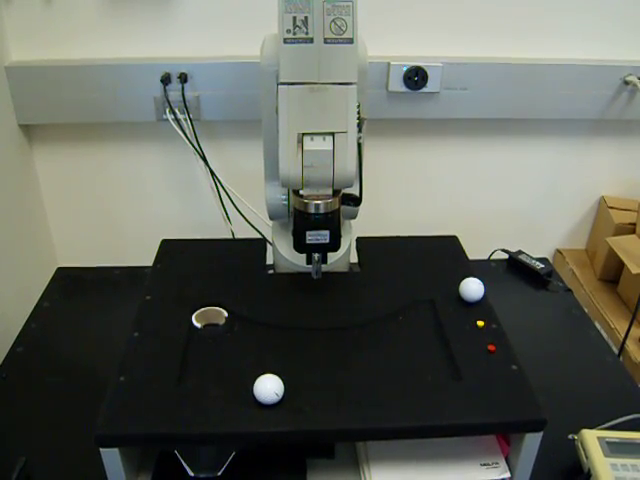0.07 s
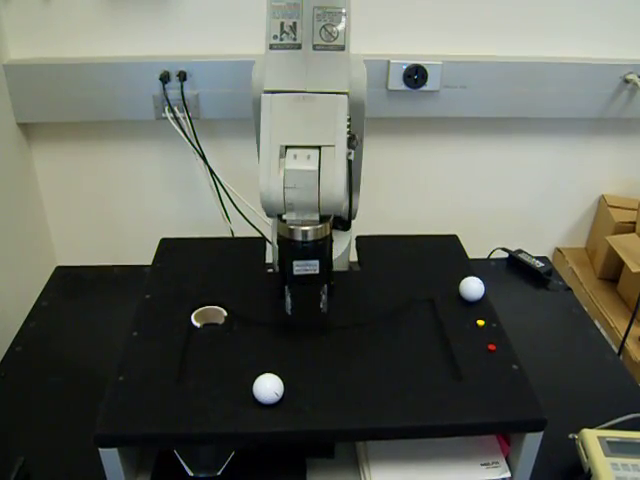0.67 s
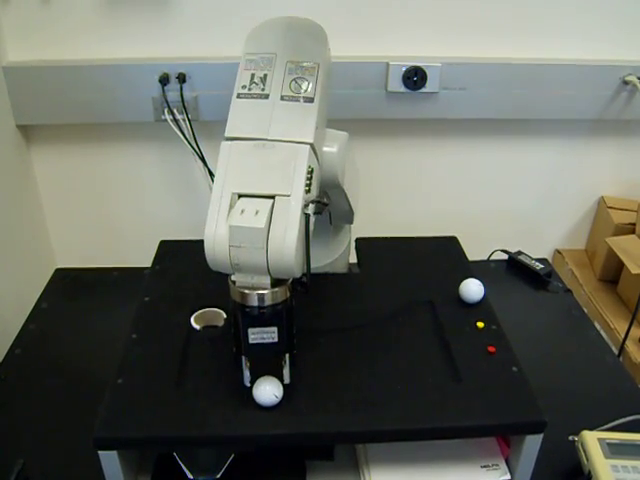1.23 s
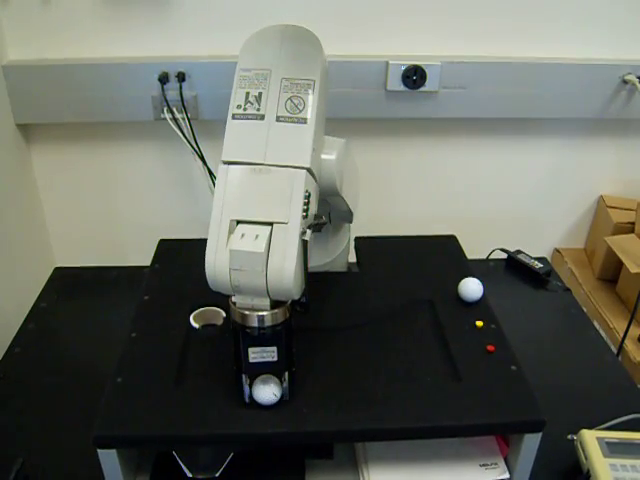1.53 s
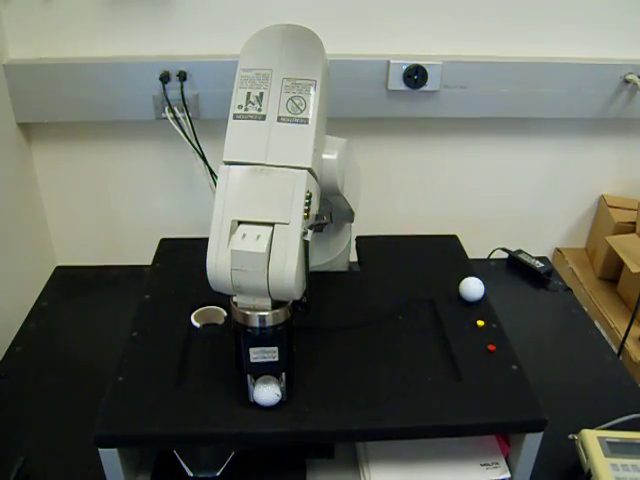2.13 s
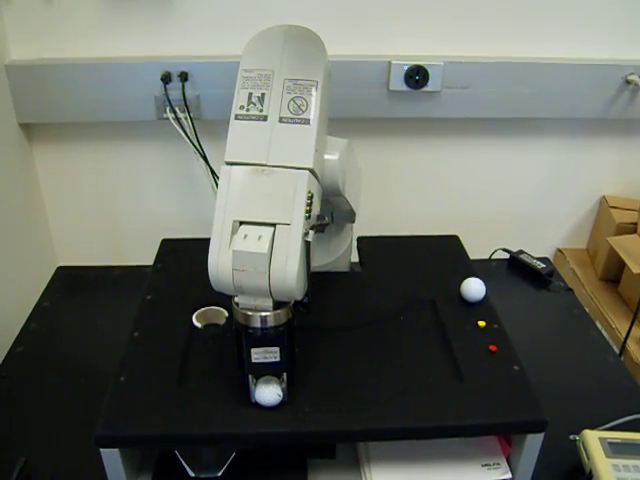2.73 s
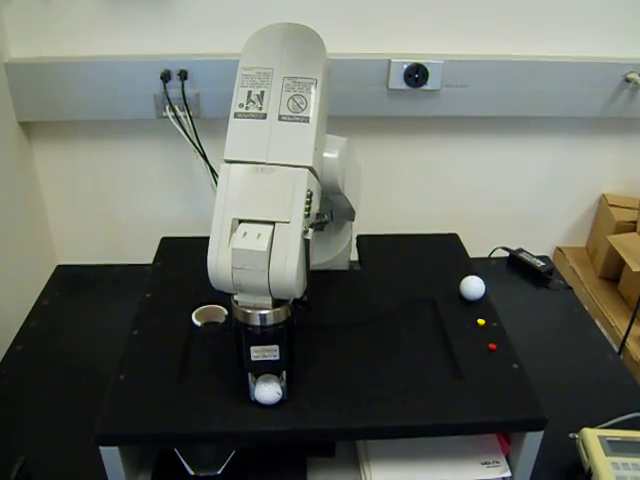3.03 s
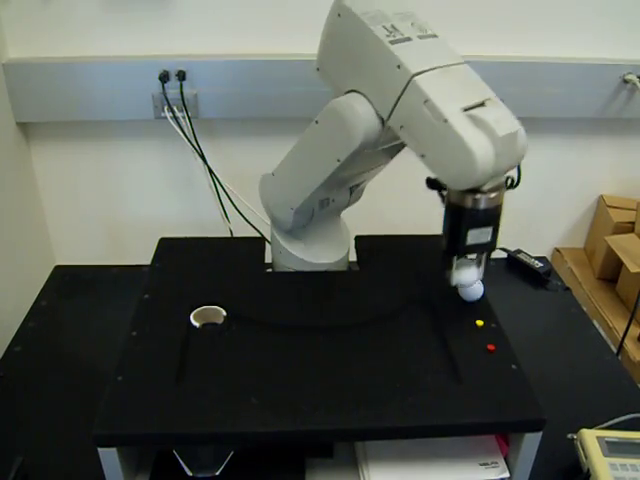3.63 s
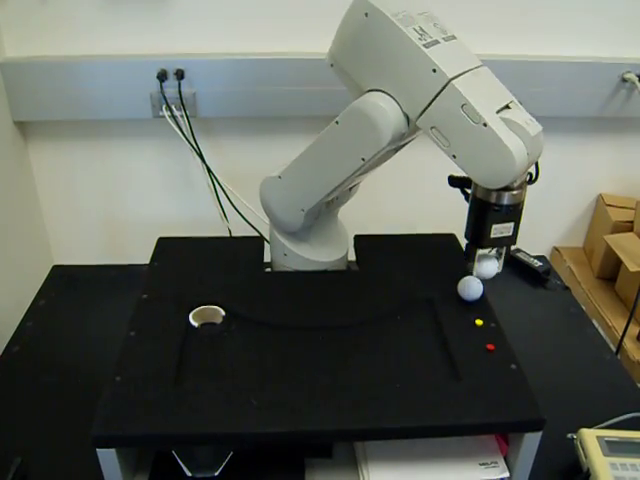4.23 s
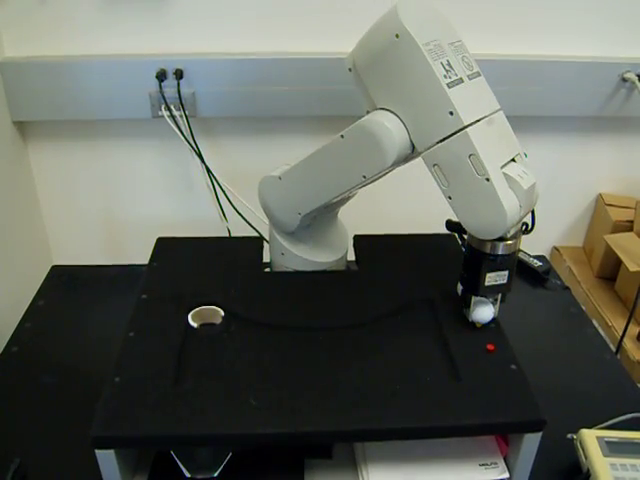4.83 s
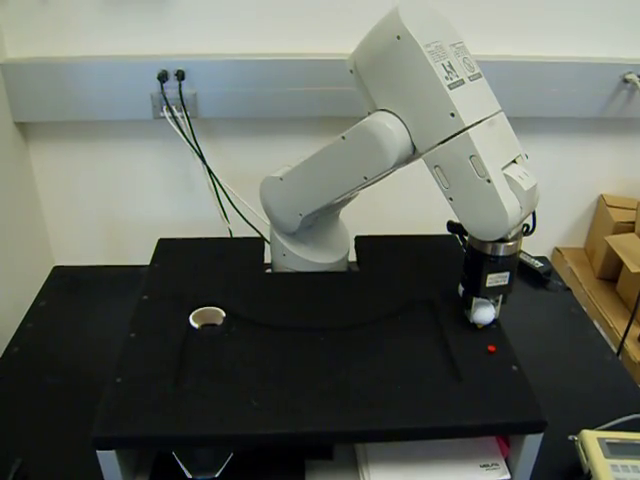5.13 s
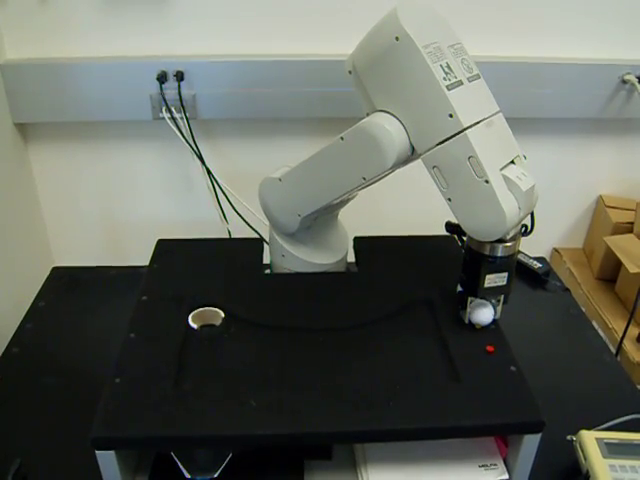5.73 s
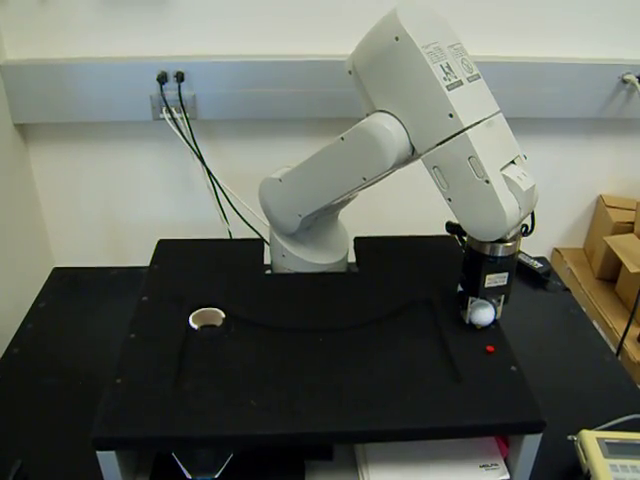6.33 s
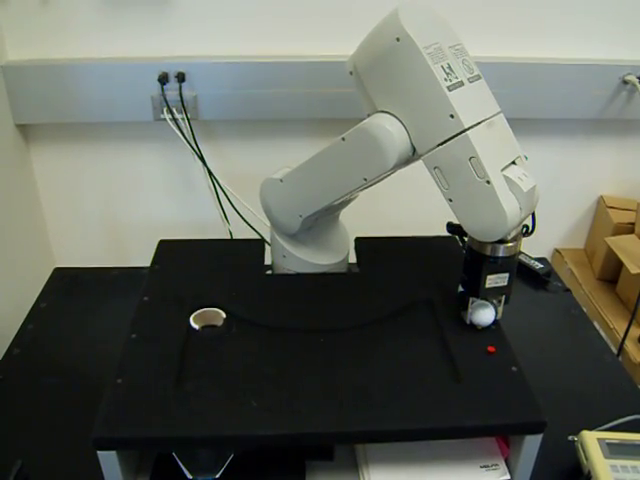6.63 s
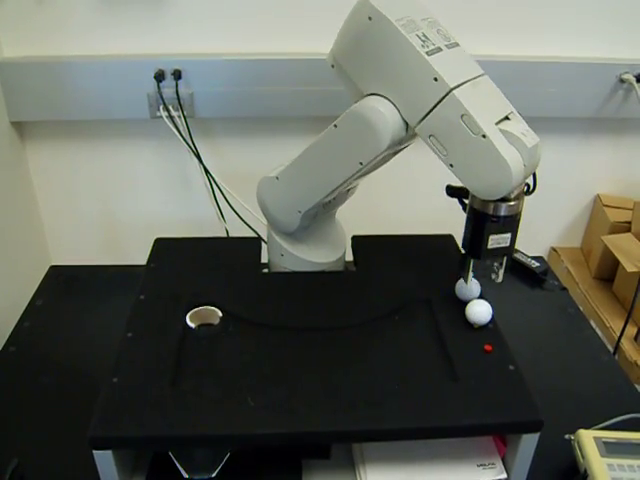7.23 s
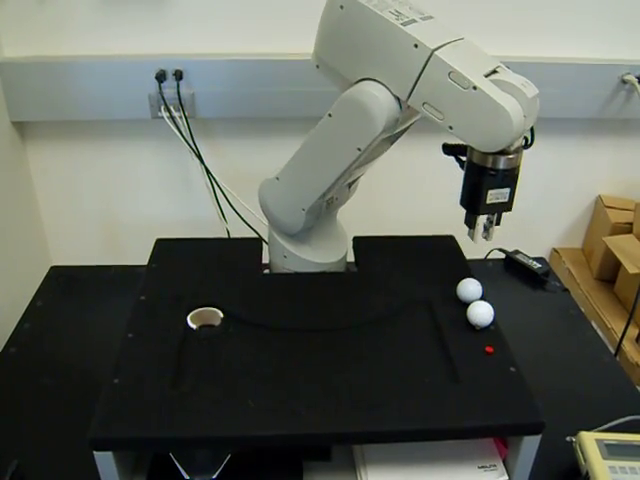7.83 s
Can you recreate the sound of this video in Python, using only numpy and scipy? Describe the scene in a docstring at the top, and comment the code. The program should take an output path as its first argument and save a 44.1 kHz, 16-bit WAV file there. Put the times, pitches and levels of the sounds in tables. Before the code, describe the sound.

A robot arm works at a lab bench, heard through one microphone over humming controller fans. Its motors whir through two fast moves and hiss through three slow ones, with a faint high whistle. The gripper rattles and clacks four times. After the loud second clack and a sharp snap, the sound ducks for about a second. Later a golf ball knocks softly on a board as it is let go.

```python
"""At a lab bench, a robot arm picks up a golf ball and sets it down, over its controller's fans and hum.
Geared motors whir through two fast moves; bearings hiss through three slow ones, and a drive whistles.
The gripper rattles and clacks as its parts hit each other, and the released ball knocks on a board.
The grip and one sharp snap make an automatic volume control dip for about a second, then recover."""
import sys
import numpy as np
from scipy import signal
from scipy.fft import rfft, irfft, next_fast_len
from scipy.io import wavfile
from scipy.ndimage import uniform_filter1d, minimum_filter1d

SR = 44100
rng = np.random.default_rng(int(sys.argv[2]) if len(sys.argv) > 2 else 0)


def log_audio(samples):
    """Write samples as a 16-bit WAV file to the path given in sys.argv[1]."""
    # one column per channel
    frames = np.atleast_2d(samples).T
    # limit to full scale, then quantise
    limited = np.clip(frames, -1, 1)
    pcm = np.round(limited * 32767).astype(np.int16)
    wavfile.write(sys.argv[1], SR, pcm)


N = 352359
TIME = np.arange(N) / SR

# The two fast moves: (start [s], end [s])
REACH_SPAN, SWING_SPAN = (0.33, 1.225), (3.23, 3.92)
FAST_RAMP_S, SLOW_RAMP_S = 0.24, 0.18   # time to speed up, and again to brake
# Gear tones at top speed in each fast move: (pitch [Hz], relative level [dB])
REACH_TONES = [(87.9, -30), (143.5, -26.5), (217, -34), (384, -40), (883, -33), (960, -31), (1439, -22),
               (1493, -26), (1577, -28.5), (1604, -24.5), (2880, -33), (3990, -35.5)]
SWING_TONES = [(555, -34.5), (760, -40.5), (1425, -37), (1470, -38), (1620, -40), (2105, -39.5),
               (2230, -48)]
# How the arm's metal body colours each fast move: (frequency [Hz], relative level [dB])
REACH_BODY = [(50, -5), (100, -14), (220, 0.5), (320, -22.5), (400, -5), (620, -15), (950, -2.5),
              (1230, -12), (1520, -6), (2250, -11.5), (2900, -11.5), (4000, -14), (5300, -20.5),
              (7250, -12.5)]
SWING_BODY = [(90, -33), (200, -21), (450, -5), (560, -10.5), (660, -17), (900, -12.5), (1250, -9.5),
              (1520, -5), (1830, -12.5), (2300, -7.5), (4400, -14), (5000, -10.5), (5600, -17.5),
              (7250, -12)]
# Slow moves: (start [s], end [s], hiss level halfway [dB])
SLOW_MOVES = [(1.138, 1.675, -30.5), (3.76, 4.82, -33.5), (6.823, 8.2, -29.5)]
# The colour of the bearing hiss: (frequency [Hz], relative level [dB])
BEARING_COLOUR = [(100, 1), (220, 2.5), (430, 3.5), (700, -8), (1500, -1), (2100, -9.5), (2900, 0),
                  (3900, -2), (4600, -2.5), (5050, -1), (5500, -5.5), (6600, -9.5), (7300, -6),
                  (8000, -5.5)]
# When a drive whistles: (start [s], end [s], level [dB])
WHISTLES = [(0.68, 1.2, -37), (1.315, 1.606, -32.5), (3.48, 3.9, -41), (3.96, 4.812, -41.5),
            (6.903, 7.7, -42)]

# The ways the gripper rings: (pitch [Hz], width [Hz], relative level [dB])
GRIPPER_RINGS = [(779, 290, 0), (1125, 550, 0.5), (1836, 810, -1.5), (3166, 270, 2), (3810, 160, 2.5),
                 (4520, 350, 1.5), (5370, 1700, -10), (8200, 7800, -12.5)]
# Gripper strokes; a fade time is how long a sound takes to fall by 60 dB: (start [s], stop [s],
# drive level [dB], first clack [dB], its fade time [s], last clack [dB], time from touch to stop [s])
STROKES = [(0.1226, 0.46, -22, -15.5, 0.26, -10, 0.011), (2.0559, 2.1418, -22.5, -13, 0.12, 0.5, 0.019),
           (5.6956, 5.7848, -23, -17, 0.079, -14, 0.0105), (7.676, 7.983, -28, -16.5, 0.14, -18.5, 0.018)]
# The finger links catch on the way: (time [s], level [dB])
CATCHES = [(0.2432, -18), (0.3362, -22.5), (2.106, -17), (5.726, -20), (7.8837, -23), (7.9127, -23.5)]
# The extra ring in each kind of clack: (pitch [Hz], width [Hz], relative level [dB])
START_RING, STOP_RING, CATCH_RING = (4550, 350, 6), (2960, 350, 7.5), (4960, 350, 6)
# The ways the snap rings: (pitch [Hz], relative level [dB], fade time [s])
SNAP_RINGS = [(950, -7, .006), (1550, -4, .007), (2350, -10, .007), (3230, -15, .008), (4000, -22, .04),
              (4800, -13, .009), (5750, -21, .055), (5980, -16, .035), (7500, -17, .012)]
# The ball's knocks on the board: (time [s], level [dB])
BALL_KNOCKS = [(5.7205, -13), (5.730, -19.5), (5.749, -20.5), (5.7684, -19), (5.783, -21), (5.81, -22.5)]
# The ways the board rings: (pitch [Hz], width [Hz], relative level [dB])
BOARD_RINGS = [(247, 34, 6.5), (480, 106, -7.5), (695, 46, 1.5), (920, 39, -7), (1135, 120, -10),
               (1630, 170, -15)]

# The colour of the fans' rushing air: (frequency [Hz], relative level [dB])
FAN_COLOUR = [(12, -24), (22, -0.5), (38, 5), (52, -16), (150, -0.5), (205, -7.5), (255, -5.5),
              (440, -11.5), (560, -16), (830, -14), (1150, -18), (1950, -22), (2750, -20), (5500, -28)]
# Mains hum, plus a fan blade tone that beats with the third hum tone: (pitch [Hz], relative level [dB])
HUM_TONES = [(58.6, -40), (117.7, -39), (176.4, -36.5), (174.4, -40.5), (239.5, -45)]
# The thin whine of fans and drives: (pitch [Hz], relative level [dB])
WHINE_TONES = [(613.7, -60.5), (1054, -46), (1227.5, -55), (1405, -54.5), (1755, -58), (2810, -66.5),
               (3338, -79.5), (5744, -64), (5960, -57)]
# How the controller's sound changes as the arm moves in front of it: (time [s], level change [dB])
CONTROLLER_LEVEL = [(0, -0.5), (2.0, -0.5), (2.9, -5), (3.95, -4.5), (4.7, -2), (5.4, -0.5), (6.4, -4.5),
                    (7.9, 0.5)]


def geared_motor(span, tones, body, grind_db, tones_db, turn_hz, throb_db,
                 wobble, speed_power, brake_db, swell_db_per_s):
    """Gear teeth grind inside the metal body; their tones rise with speed and stand out near the top."""
    speed = move(*span, FAST_RAMP_S)
    braking = uniform_filter1d(np.maximum(-np.gradient(speed, TIME), 0), SR // 20)
    pitch = speed * (1 + wobble * drift(46.3))
    turn = np.sin(2 * np.pi * np.cumsum(turn_hz * pitch) / SR)   # one wave per motor turn
    teeth = rng.standard_normal(N) + tiny_ticks(per_s=1500, spread_db=4.5)
    teeth += 0.8 * rotor_buzz(turn_hz * pitch)
    grind = from_db(grind_db) * coloured(teeth * from_db(throb_db * turn), body)
    whir = sum(tone(hz * pitch, db + tones_db + 3.87 * drift(30)) for hz, db in tones)
    swell_db = swell_db_per_s * (np.clip(TIME, *span) - np.mean(span))
    load_db = brake_db * braking + swell_db   # slowing down loads the teeth
    return speed ** speed_power * from_db(load_db) * (speed ** 2.8 * whir + grind)


def bearing_hiss(swell_db=6.5):
    """Rolling bearings hiss at low speed, growing louder as each slow move goes on."""
    rolling = coloured(rng.standard_normal(N) + tiny_ticks(per_s=760, spread_db=3.5), BEARING_COLOUR)
    level = 0
    for start, end, db in SLOW_MOVES:
        progress = np.clip((TIME - start) / (end - start), 0, 1)
        level += move(start, end, SLOW_RAMP_S) * from_db(db + swell_db * (progress - 0.5))
    return level * from_db(2.1 * drift(40)) * rolling


def gripper(strain_s=0.06, strain_db=3.5, touch_db=-4.5):
    """Each stroke clacks as it starts, ticks as it runs, strains, touches lightly and hits its stop."""
    running = 0
    for start, stop, db, *_ in STROKES:
        straining = TIME > stop - strain_s
        running += from_db(db + strain_db * straining) * ((TIME > start) & (TIME < stop))
    throb_hz = 42 * (1 + 0.13 * drift(21))
    throb = from_db(2.7 * np.sin(2 * np.pi * np.cumsum(throb_hz) / SR))
    rubbing = 0.27 * tiny_ticks(per_s=820, spread_db=5.0) + 0.48 * rng.standard_normal(N)
    screw_ring = (4740, 390, 2.8)   # the drive screw adds its own ring
    out = resonate(running * throb * rubbing, GRIPPER_RINGS + [screw_ring])
    for start, stop, _, start_db, start_fade_s, stop_db, gap_s in STROKES:
        add(out, start, clack(start_db, START_RING, start_fade_s))
        add(out, stop - gap_s, clack(stop_db + touch_db, STOP_RING))
        add(out, stop, clack(stop_db, STOP_RING))
    for time_s, db in CATCHES:
        add(out, time_s, clack(db, CATCH_RING, fade_s=0.032))
    return out


def clack(db, ring, fade_s=0.029):
    """The finger links hit each other once, and one ring stands out."""
    return from_db(db) * rattle(fade_s, GRIPPER_RINGS + [ring])


def snap(time_s=2.3609, boost_db=20.5):
    """One hard hit sets off several rings that die away quickly."""
    out, age = np.zeros(N), np.arange(SR // 10) / SR
    for k, (hz, db, fade_s) in enumerate(SNAP_RINGS):
        fade = from_db(boost_db + db - 60 * age / fade_s)
        add(out, time_s, (-1) ** k * fade * np.sin(2 * np.pi * hz * age))
    return keep_band(out, "high", hz=550)


def ball():
    """The released ball settles on the board with a few dull knocks."""
    out = np.zeros(N)
    for time_s, db in BALL_KNOCKS:
        add(out, time_s, from_db(db) * rattle(fade_s=0.098, rings=BOARD_RINGS))
    return out


def shudder(time_s=3.762):
    """Braking from the swing shakes the whole arm in one short, low thud."""
    out = np.zeros(N)
    add(out, time_s, from_db(-25) * rattle(fade_s=0.12, rings=[(145, 50, 0)]))
    return keep_band(out, "low", hz=260)


def drive_whistle(flicker_db=3):
    """A drive rings at one high, unsteady pitch that swells and dies as the arm moves."""
    ring = resonate(rng.standard_normal(N), [(5044, 91, 0)])
    ring = unit_power(resonate(ring, [(4930, 160, 0)]))
    level = sum(from_db(db) * move(start, end, SLOW_RAMP_S) for start, end, db in WHISTLES)
    return level * from_db(flicker_db * drift(25)) * ring


def holding_joint(start_s=5.7, end_s=6.85, hz=4590, db=-53.5):
    """A joint sings faintly while it holds still under load."""
    return move(start_s, end_s, SLOW_RAMP_S) * tone(hz * (1 + 0.0045 * drift(45)), db + 3 * drift(17))


def controller(air_db=-28, whine_fade_db_per_s=0.63):
    """Fans push air and buzz faintly, the mains hums, and thin whines waver and slowly fade."""
    change_db = np.interp(TIME, *np.transpose(CONTROLLER_LEVEL))
    whine_db = 9.5 + 1.22 * change_db - whine_fade_db_per_s * TIME
    buzz = keep_band(rotor_buzz(87.75 * (1 + 0.00071 * drift(7.95))), "high", hz=300)
    air = from_db(air_db) * coloured(rng.standard_normal(N) + from_db(-9.5) * buzz, FAN_COLOUR)
    hum = sum(tone(hz * (1 + 0.00391 * drift(3.59)), db + 2.8 * drift(4.3)) for hz, db in HUM_TONES)
    whine = sum(tone(hz * (1 + 0.0008 * drift(7.8)), db + 1.4 * drift(7.9)) for hz, db in WHINE_TONES)
    return from_db(change_db) * (air + hum) + from_db(whine_db) * whine


def room_echo(x, early_db, early_fade_s, late_db, late_fade_s):
    """Sound bounces off the nearby bench and wall, then lingers faintly in the room."""
    age = np.arange(SR // 2) / SR
    echoes = 0
    for db, fade_s in (early_db, early_fade_s), (late_db, late_fade_s):
        tail = rng.standard_normal(len(age)) * (age > 0.004) * from_db(-60 * age / fade_s)
        echoes += from_db(db) * tail / np.linalg.norm(tail)
    return x + signal.fftconvolve(x, echoes)[:N]


def move(start, end, ramp_s):
    """Speed from 0 to 1: ease up from rest, cruise, then ease back to rest."""
    return np.sin(np.pi / 2 * np.clip(np.minimum(TIME - start, end - TIME) / ramp_s, 0, 1))


def rotor_buzz(turn_hz):
    """The same rough spots on a spinning part come round on every turn, making a buzz."""
    roughness = rng.standard_normal(400)
    place = np.cumsum(turn_hz) / SR % 1
    return unit_power(np.interp(place, np.linspace(0, 1, len(roughness)), roughness))


def tiny_ticks(per_s, spread_db):
    """Tiny hits of uneven size land at random times."""
    sizes = from_db(spread_db * np.minimum(rng.exponential(1, N), 3)) * rng.choice([-1, 1], N)
    return unit_power(sizes * (rng.random(N) < per_s / SR))


def rattle(fade_s, rings):
    """A loose part shakes against a body: ringing noise rises fast, then dies away."""
    age = np.arange(SR // 4) / SR
    burst = resonate(rng.standard_normal(len(age)), rings)
    even_burst = burst / np.sqrt(uniform_filter1d(burst ** 2, SR // 250))
    shape = (1 - np.exp(-age / 0.0016)) * from_db(-60 * age / fade_s)
    return even_burst * shape / np.sqrt(uniform_filter1d(shape ** 2, SR // 300).max())


def resonate(x, rings):
    """Make a sound ring at a body's own pitches; narrower rings last longer."""
    out, power = 0, 0
    for k, (hz, width, db) in enumerate(rings):
        decay, gain = np.exp(-np.pi * width / SR), from_db(db)
        feed = np.array([1, 0, -1]) * (1 - decay ** 2) / 2
        feedback = [1, -2 * decay * np.cos(2 * np.pi * hz / SR), decay ** 2]
        out += (-1) ** k * gain * signal.lfilter(feed, feedback, x + 1e-18)
        power += gain ** 2 * np.pi * width / SR
    return out / np.sqrt(power)   # white noise keeps its power


def coloured(x, colour):
    """Turn a sound's lows and highs up or down along a curve, at a power of 1."""
    size = next_fast_len(N)
    hz, db = np.transpose(colour)
    log_hz = np.log(np.arange(size // 2 + 1) * SR / size + 1)
    gain = from_db(np.interp(log_hz, np.log(hz), db))
    return unit_power(irfft(rfft(x, size) * gain, size)[:N])


def drift(rate_hz):
    """A smooth random wander, about 1 in size; a higher rate wanders faster."""
    step, warm_up = 40, 2000
    decay = np.exp(-2 * np.pi * rate_hz * step / SR)
    noise = rng.standard_normal(N // step + warm_up + 2)
    slow = signal.lfilter([1], [1, -2 * decay, decay ** 2], noise)[warm_up:]
    return np.interp(np.arange(N) / step, np.arange(len(slow)), unit_power(slow))


def tone(hz, db):
    """A pure tone that follows a changing pitch and level."""
    return np.sqrt(2) * from_db(db) * np.sin(2 * np.pi * (np.cumsum(hz) / SR + rng.random()))


def keep_band(x, side, hz):
    """Keep the "low" or "high" side of a frequency and soften the rest."""
    return signal.sosfilt(signal.butter(2, hz, side, fs=SR, output="sos"), x)


def add(track, time_s, sound):
    """Mix a sound into a track at the given time."""
    start = min(int(time_s * SR), N)
    track[start:start + len(sound)] += sound[:N - start]


def from_db(db):
    """Turn decibels into a number to multiply by."""
    return 10 ** (np.asarray(db) / 20)


def unit_power(x):
    """Scale a sound so its average power is 1."""
    return x / np.sqrt(np.mean(x ** 2) + 1e-20)


def volume_control(x, limit_db, hold_s, recover_db_per_s):
    """Loud peaks pull the volume down at once; it stays down a moment, then comes back."""
    power = uniform_filter1d(x ** 2, SR // 400)
    over_db = np.maximum(10 * np.log10(np.abs(power) + 1e-12) - limit_db, 0)
    half = int(hold_s * SR / 2)
    held_db = -minimum_filter1d(-over_db, 2 * half + 1, origin=half, mode="constant")
    ramp_db = recover_db_per_s * TIME
    cut_db = np.maximum.accumulate(held_db + ramp_db) - ramp_db
    return x * from_db(-uniform_filter1d(cut_db, SR // 1000))


def scene():
    """Mix the moving arm, the echoing hits and the background into one channel."""
    reach = geared_motor(REACH_SPAN, REACH_TONES, REACH_BODY, grind_db=-16.5, tones_db=-3.0,
                         turn_hz=58.4, throb_db=2.5, wobble=0.004, speed_power=1.39,
                         brake_db=0.4, swell_db_per_s=-1.0)
    swing = geared_motor(SWING_SPAN, SWING_TONES, SWING_BODY, grind_db=-27.5, tones_db=-3.5,
                         turn_hz=46.28, throb_db=0.0, wobble=0.00595, speed_power=1.54,
                         brake_db=-0.03, swell_db_per_s=5)
    hits = gripper() + ball() + snap()
    hits = room_echo(hits, early_db=-10.0, early_fade_s=0.095, late_db=-19, late_fade_s=0.36)
    background = controller() + holding_joint()
    arm = reach + swing + bearing_hiss() + drive_whistle() + shudder()
    return (arm + hits + background)[None]


def record(dry):
    """Turn down loud moments, round off the peaks and cut the highest treble."""
    controlled = volume_control(dry[0], limit_db=-8.0, hold_s=0.85, recover_db_per_s=65.0)
    rounded = 0.61 * np.tanh(controlled / 0.67)
    treble_cut = signal.cheby1(14, 0.2, 7450, fs=SR, output="sos")
    dulled = signal.sosfilt(treble_cut, rounded) + from_db(-21) * rounded   # a little treble gets past
    final_cut = signal.cheby2(16, 60, 9450, fs=SR, output="sos")
    return signal.sosfilt(final_cut, dulled)[None]


dry = scene()
out = record(dry)
log_audio(out)
```